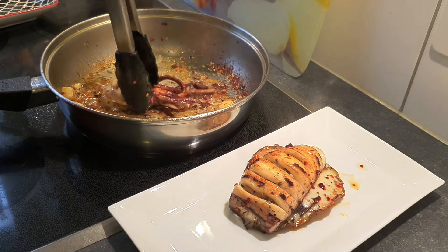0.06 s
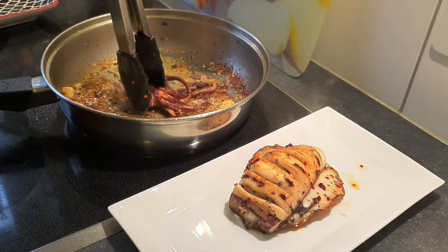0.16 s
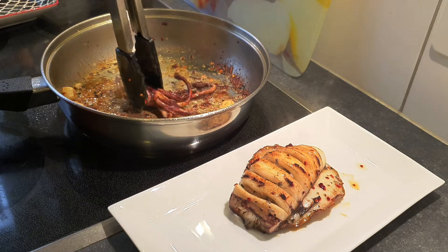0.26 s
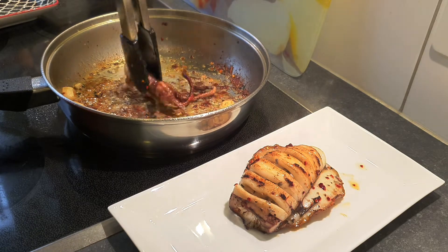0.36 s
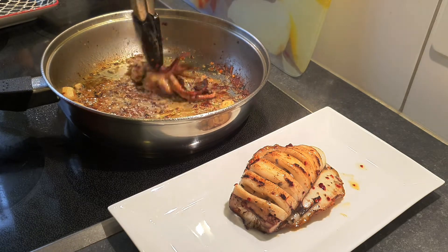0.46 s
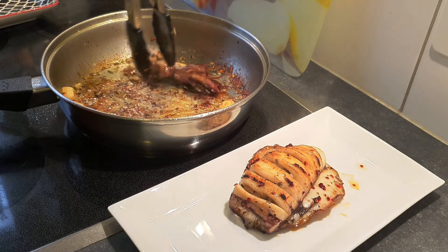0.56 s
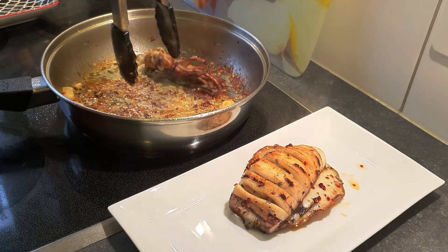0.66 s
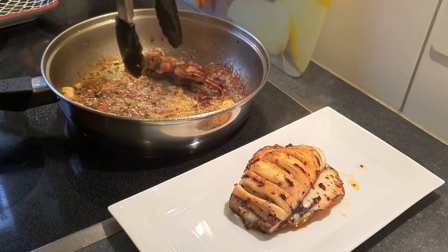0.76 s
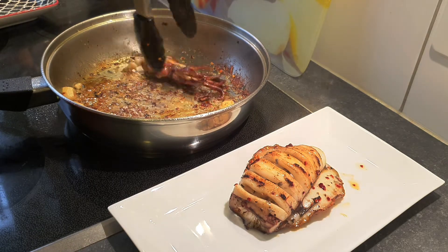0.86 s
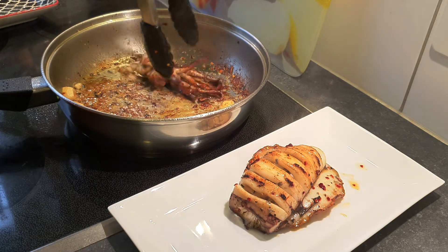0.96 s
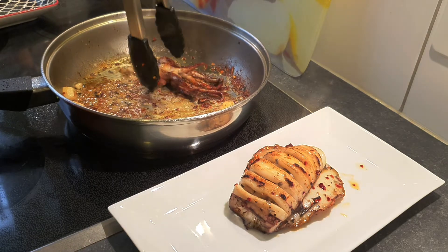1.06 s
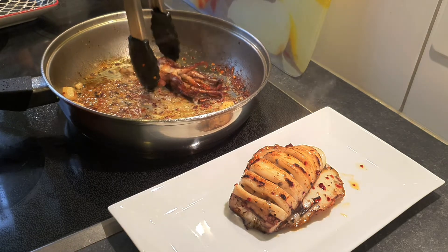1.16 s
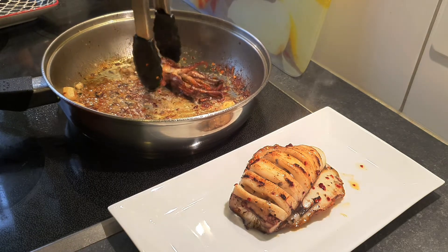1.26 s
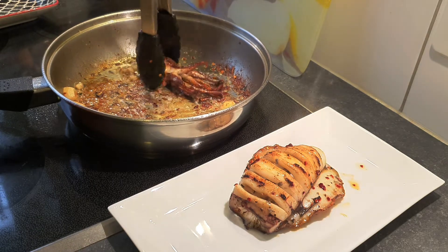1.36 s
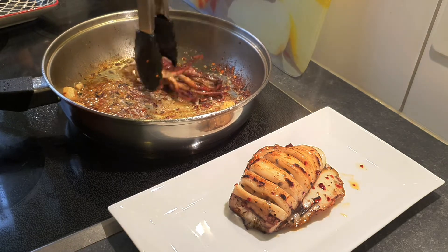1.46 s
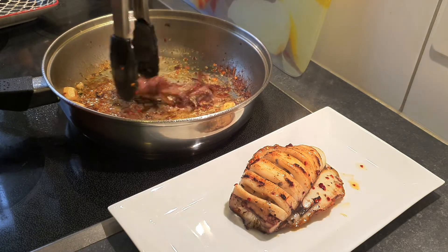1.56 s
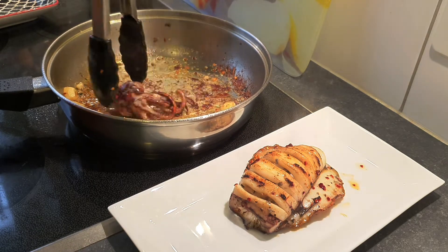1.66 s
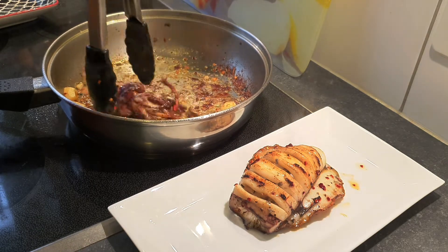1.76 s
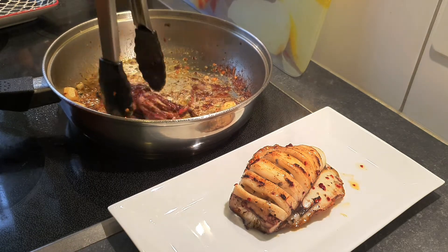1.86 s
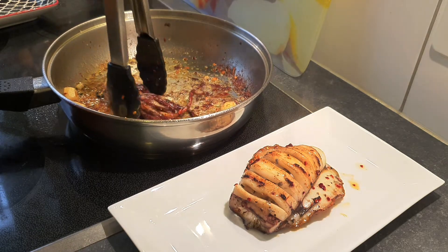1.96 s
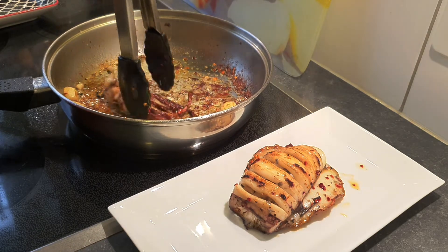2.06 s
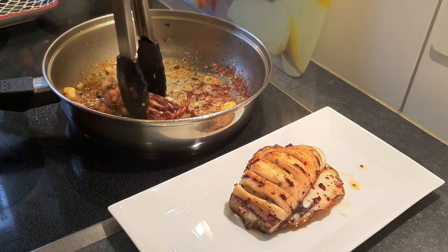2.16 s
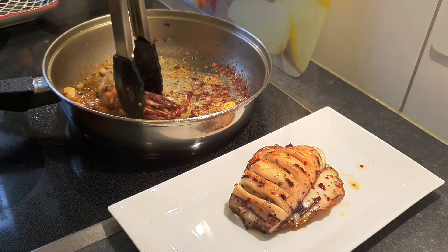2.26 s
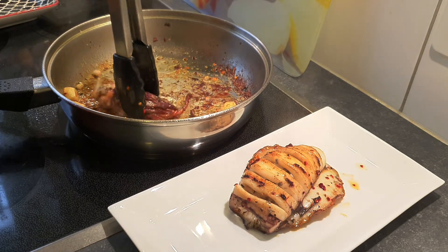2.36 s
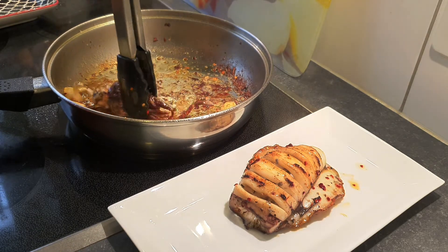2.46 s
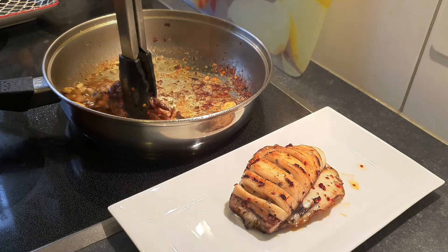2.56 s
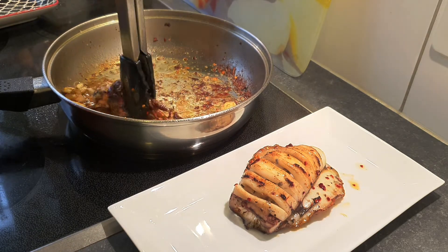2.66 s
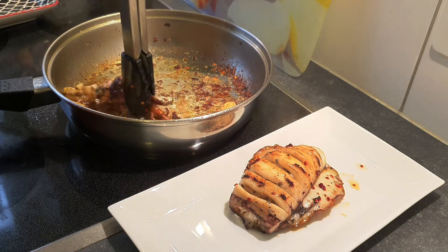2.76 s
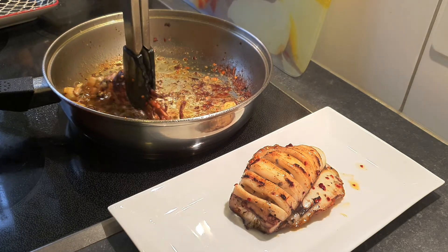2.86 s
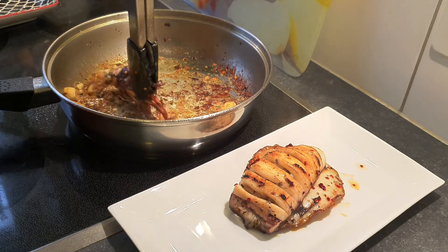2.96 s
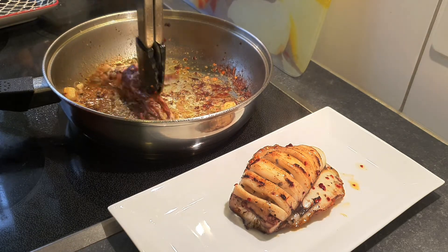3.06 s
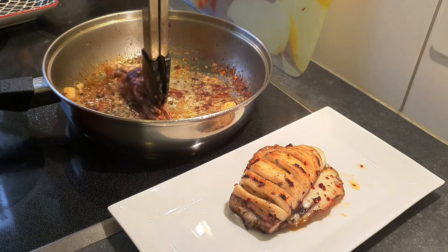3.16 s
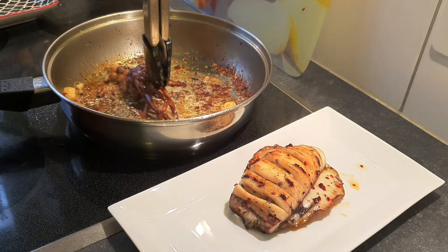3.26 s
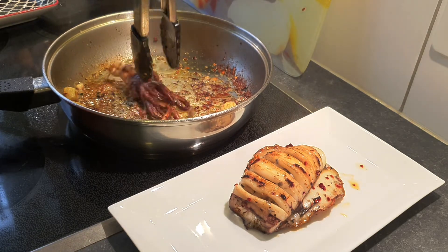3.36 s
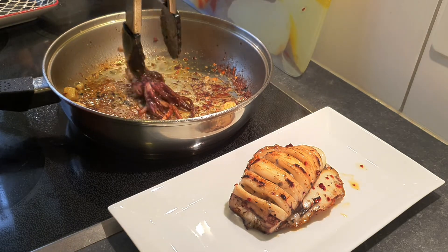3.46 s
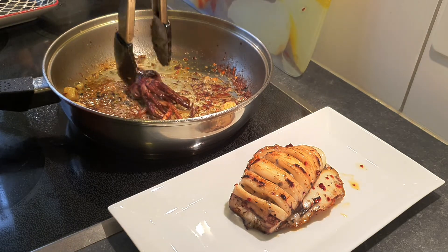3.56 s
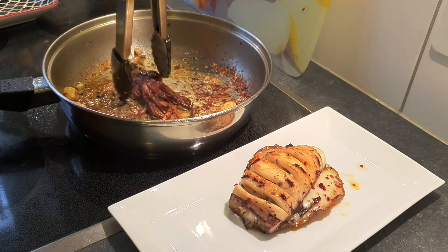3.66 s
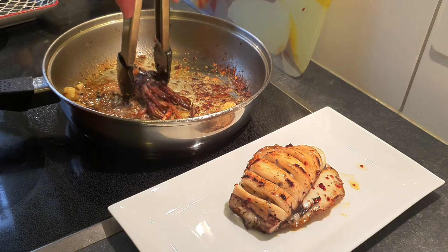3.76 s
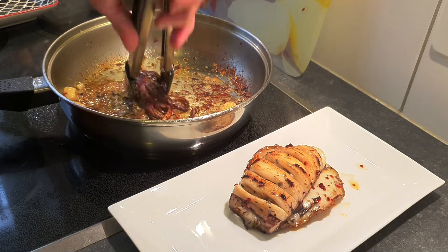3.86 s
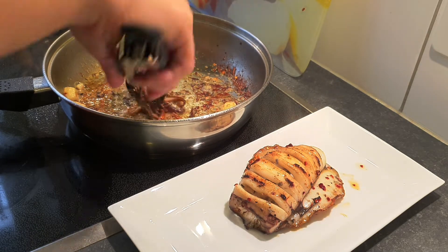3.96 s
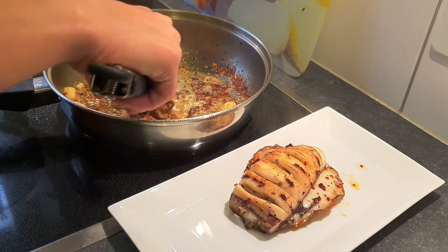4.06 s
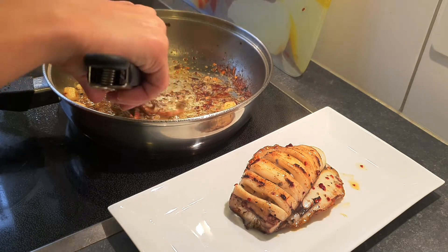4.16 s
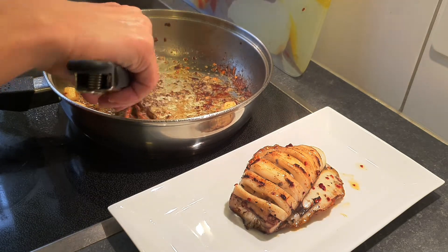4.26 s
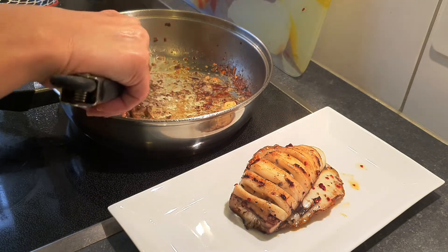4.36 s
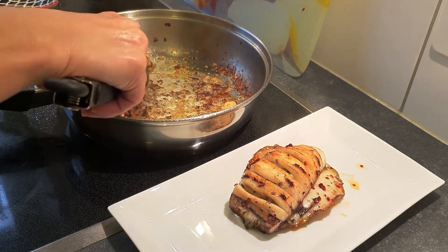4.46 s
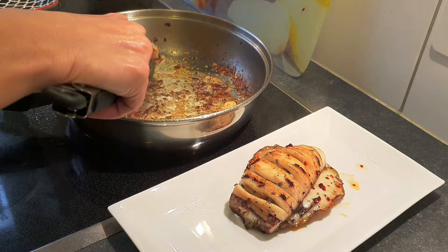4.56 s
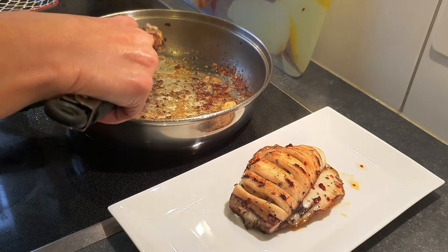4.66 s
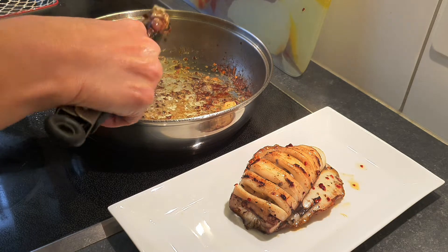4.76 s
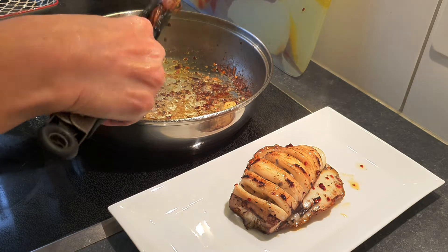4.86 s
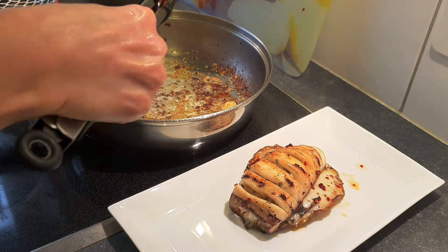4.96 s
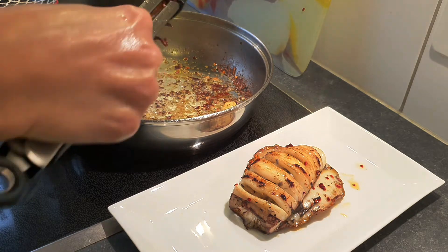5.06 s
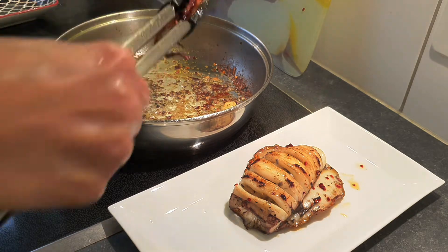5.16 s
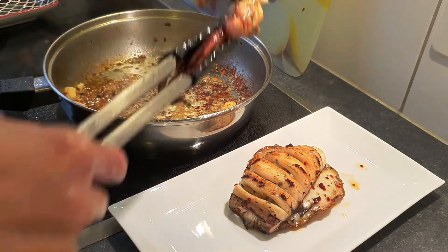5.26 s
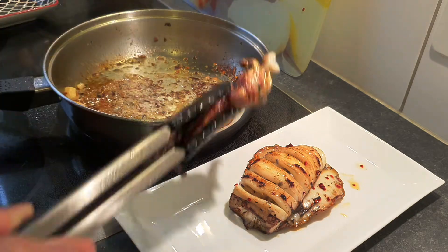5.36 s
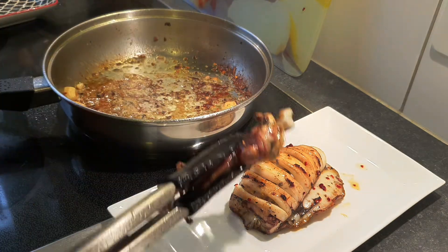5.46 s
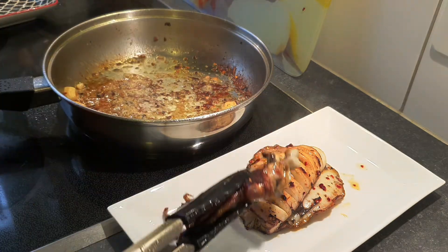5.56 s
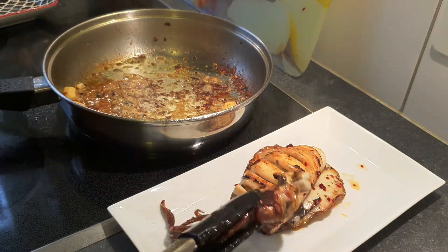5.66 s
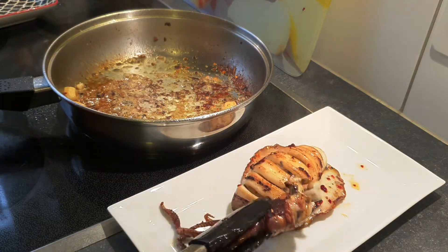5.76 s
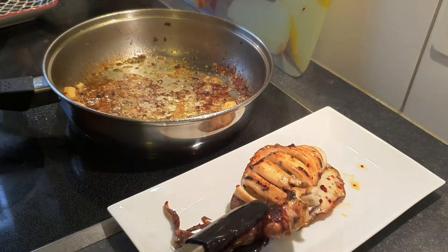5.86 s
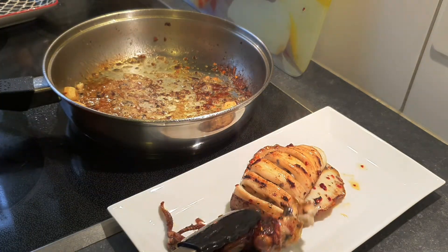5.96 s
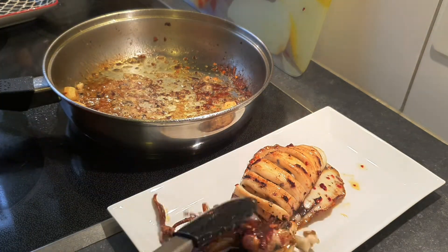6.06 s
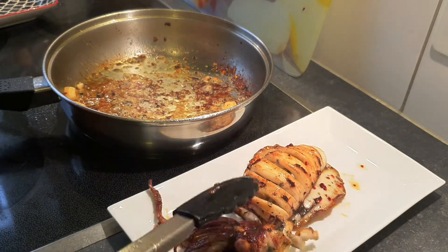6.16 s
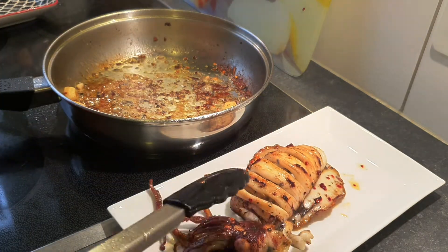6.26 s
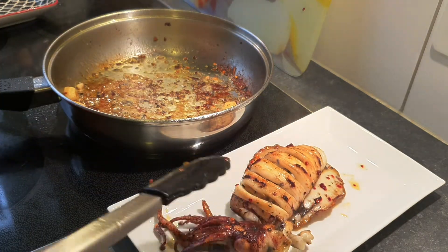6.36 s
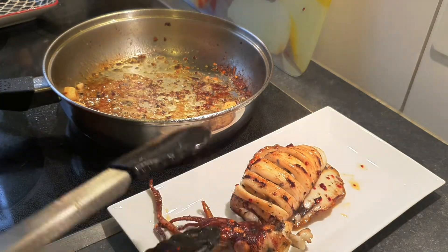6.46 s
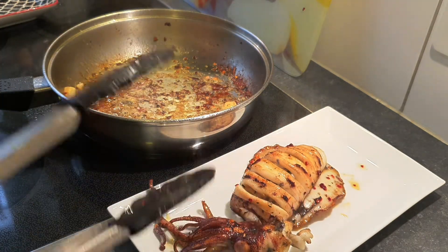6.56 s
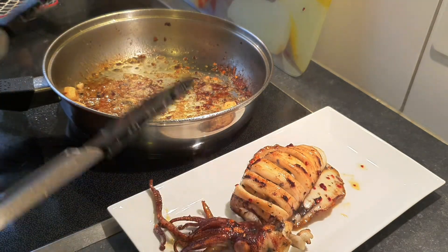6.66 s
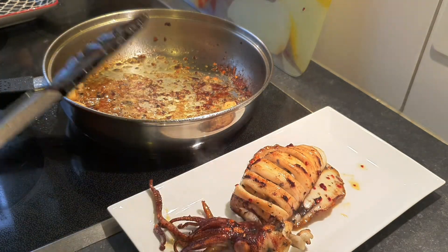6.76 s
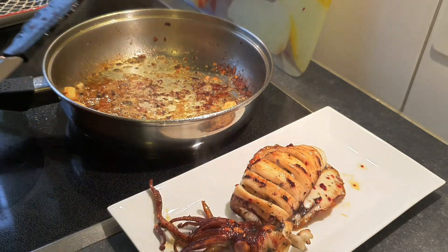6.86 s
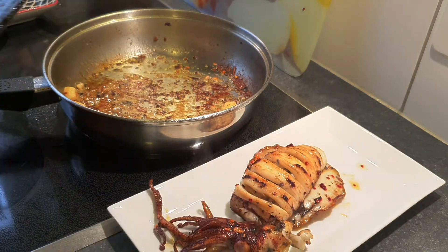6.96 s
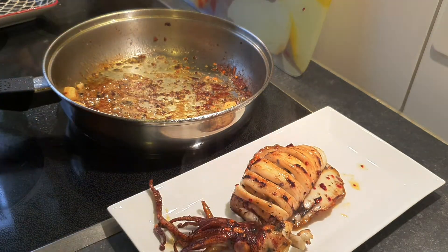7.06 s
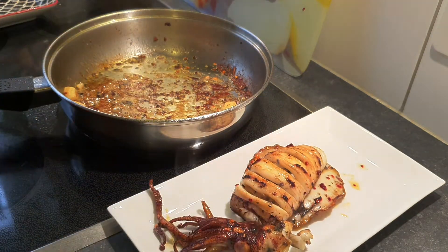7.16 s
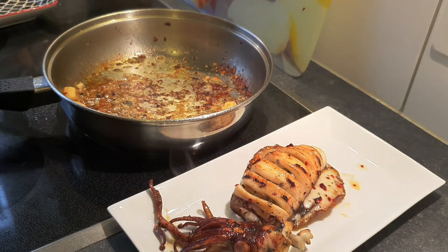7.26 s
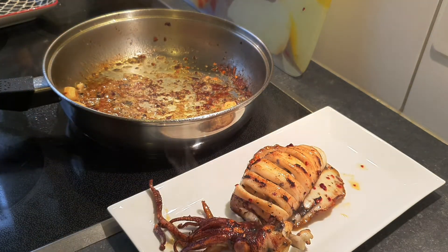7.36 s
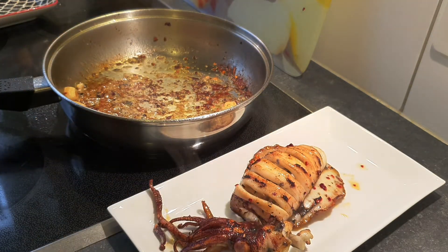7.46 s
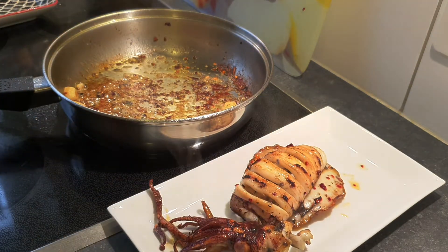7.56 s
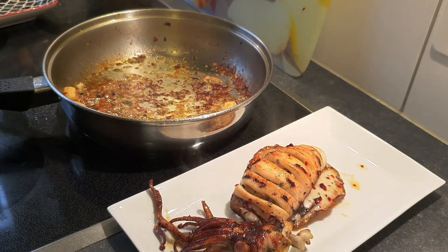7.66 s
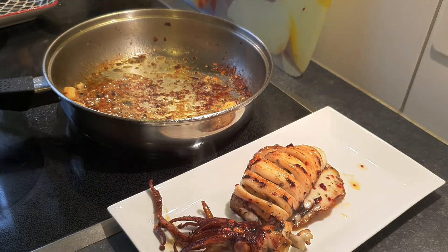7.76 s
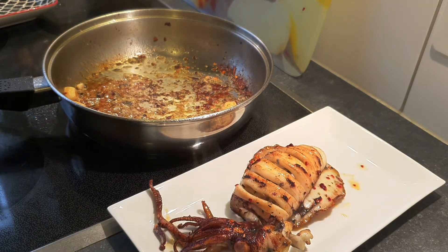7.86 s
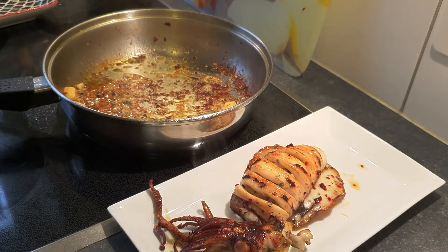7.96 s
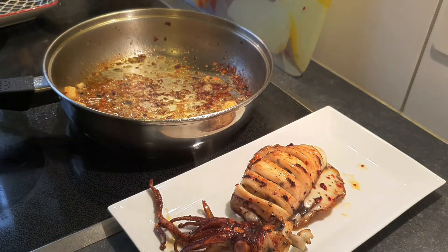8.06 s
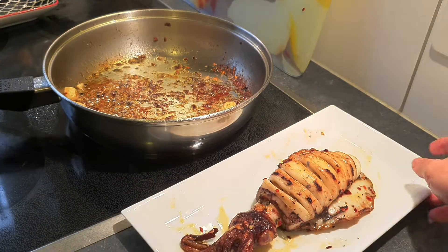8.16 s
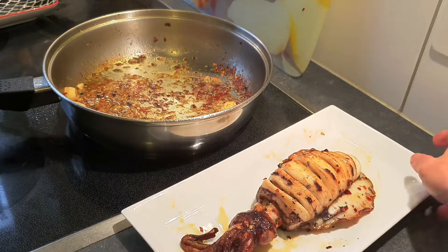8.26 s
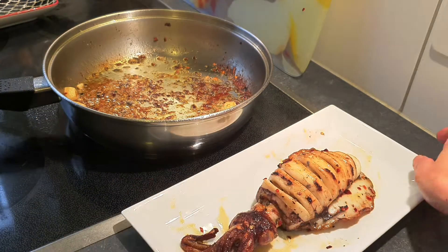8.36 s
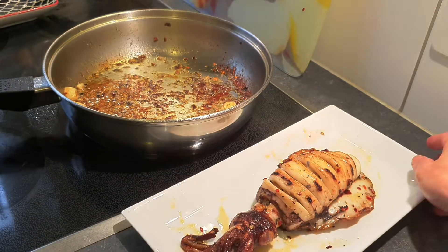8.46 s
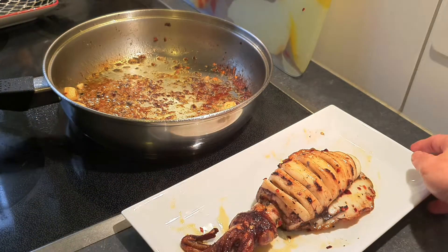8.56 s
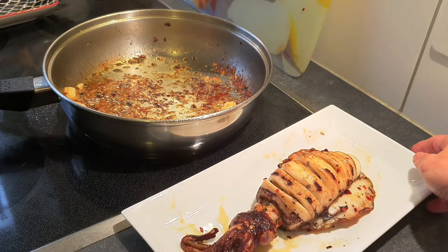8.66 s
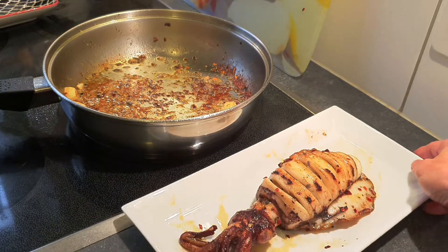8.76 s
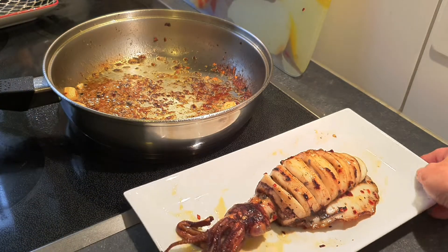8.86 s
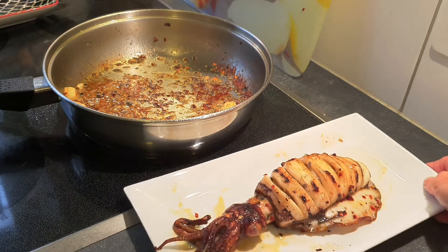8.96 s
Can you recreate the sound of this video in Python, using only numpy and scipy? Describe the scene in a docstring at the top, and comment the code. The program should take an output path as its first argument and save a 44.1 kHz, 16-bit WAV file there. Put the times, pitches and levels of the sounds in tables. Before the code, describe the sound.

Dense frying hiss with sharp oil spits and soft pan bumps dies down; after a tiny dropout a plate scrapes, squeaks faintly and clacks.

```python
"""Squid frying in a small kitchen

A close pair of microphones hears squid sizzle in hot oil in a steel pan on a glass hob: dense filtered noise
bursts. Tongs turn it, clink and bump the pan (dying modes); the oil calms to single spits once the food is
lifted out. A china plate knocks softly; around a brief silence at 8.1 s it slides, squeaks and knocks on the
worktop: modes struck by clicks or grit, and wavering tones. Mains hum and steady room noise lie behind it all."""
import sys
import numpy as np
from scipy import signal
from scipy.fft import rfft, irfft, next_fast_len
from scipy.io import wavfile
from scipy.ndimage import uniform_filter1d

SR = 44100
rng = np.random.default_rng(int(sys.argv[2]) if len(sys.argv) > 2 else 0)


def output_pcm(signal):
    """Save a mono or channel-first signal as 16-bit PCM at the path in sys.argv[1].

    Samples are clipped to [-1, 1] before scaling.
    """
    pcm = np.clip(np.atleast_2d(signal).T, -1, 1) * 32767
    wavfile.write(sys.argv[1], SR, np.round(pcm).astype(np.int16))


N = 397767
T = np.arange(N) / SR
HOP = 64  # samples between steps of the slow curves

# Levels in the tables are relative, ahead of the mixing gains and the recorder.
# How hard the oil fries: (time [s], fizz level [dB], crackle near 3 kHz against the fizz [dB])
FRYING = [(0, -37, -5.5), (.17, -37.5, -8), (.4, -36, -5), (.68, -33.5, -5), (.95, -35, -9),
          (1.4, -41, -7.5), (1.65, -39, -7), (1.94, -42.5, -9.5), (2.12, -40.5, -6.5), (2.3, -44.5, -7),
          (2.53, -36, -5.5), (2.66, -35.5, -6), (2.8, -38, -7.5), (2.92, -41, -8.5), (3.22, -38, -8),
          (3.48, -38, -6.5), (3.62, -34.5, -6.5), (4.15, -33, -5), (4.4, -37.5, -5), (5, -36.5, -8),
          (5.55, -42, -12), (5.9, -46.5, -9.5), (6.3, -51.5, -12.5), (6.65, -58.5, -17), (6.9, -55, -6.5),
          (7.15, -62.5, -7), (7.6, -64.5, -3), (8.05, -67, -16), (8.25, -76.5, 0), (8.46, -66, -3.5),
          (8.72, -71, -6), (9.02, -59.5, -5.5)]
# Colour of the frying pan and oil: (frequency [Hz], level [dB])
FIZZ_COLOUR = [(120, -48.5), (200, -24.5), (350, -25.5), (455, -12), (520, -12.5), (585, -20), (650, -8.5),
               (760, -9), (860, -13), (1010, -6.5), (1200, -10.5), (1450, -8), (1670, -10), (2000, -3),
               (2550, -3.5), (2850, 2.5), (3200, -1), (3550, 2), (4500, -0.5), (6500, -2.5), (7300, -5),
               (7800, -0.4), (9300, 5), (14000, 0.22), (15300, -1.5), (15800, 1.5)]
# Rarer, sharper bursts in the oil: (centre frequency [Hz], level [dB])
POPS = [(3600, -8), (6000, -10), (10000, -14), (13500, -7.5)]
POPS_PER_S, POP_T60_S, POP_SPREAD_DB = 30, 0.012, 3  # rate is for each row of POPS
# The bubbling under 1.5 kHz follows the fizz and crackle, down to a steady simmer
BUBBLING_DB, BUBBLING_FOLLOWS, SIMMER_DB, SIMMER_TOP_HZ = -13.5, 1.09, -71.5, 900
CLUMP_DB, CLUMP_S = 1.5, 0.05  # the bubbling comes and goes at random

# Bursting steam pockets, and near 6.07 s food set down on the plate: (time [s], peak level [dB], centre
# frequency [Hz], spray level against the crack [dB])
SPITS = [(0.066, -25, 4600, -13), (0.2305, -23, 5600, -13.5), (0.267, -27, 13000, -29),
         (0.2951, -21, 11200, -26), (0.355, -21.5, 4220, -20), (0.378, -25.5, 3280, -25),
         (0.47, -29, 8000, -15), (0.898, -16, 12100, -30), (1.2578, -22, 11400, -20),
         (1.6132, -26.5, 9760, -23), (1.6805, -31, 11600, -10), (2.05, -21, 6360, -19),
         (2.103, -25.5, 12500, -20.5), (2.176, -25, 9000, -25), (2.233, -29, 9700, -16),
         (2.3351, -45, 10100, -24.5), (2.51, -39, 4200, -32), (2.655, -23, 11000, -25.5),
         (2.854, -27.5, 8430, -29.5), (3.031, -26, 12700, -18), (3.1746, -24.5, 9420, -26),
         (5.1538, -28, 9750, -24), (5.4534, -30, 10400, -15), (5.6517, -24.5, 9940, -15),
         (5.7147, -28.5, 8290, -17), (5.937, -30, 9340, -17), (6.065, -29, 8520, -16),
         (6.071, -32.5, 3040, -11), (6.0976, -33, 11000, -15.5), (6.2226, -33, 10500, -18),
         (6.4234, -38, 10100, -13), (6.465, -35, 10400, -8), (6.559, -37.5, 8600, -14.5),
         (6.6314, -44, 10900, -21), (6.693, -47, 6000, -25), (6.71, -33, 11500, -25),
         (6.7519, -46.5, 11000, -15.5), (6.8067, -49, 9250, -15), (6.847, -32.5, 11800, -25),
         (6.872, -26, 9900, -38), (6.8937, -25, 11200, -36), (6.997, -45, 12700, -28),
         (7.0043, -29.5, 9800, -26.5), (7.019, -32, 9290, -31), (7.1919, -46, 8414, -28),
         (7.4874, -43.5, 10470, -16.5), (7.6085, -42, 9530, -22), (7.7667, -44, 10330, -25),
         (7.9314, -48.5, 9170, -24), (8.003, -39.5, 10900, -13)]
CRACK_RISE_S, CRACK_T60_S = 0.001, 0.022
CRACK_LOW, CRACK_HIGH, CRACK_TOP_HZ = 0.38, 1.8, 19000  # band edges as multiples of the centre, and their limit
SNAP = 3  # first click against the noise
SPRAY_T60_S, SPRAY_PATTER_DB = 0.25, 3.0
# One large bubble, a single row: [time [s], peak level [dB], frequency [Hz], t60 [s]]
BUBBLE = [3.0185, -40, 1460, 0.035]
# A soft hiss around 3 kHz swells and fades: (start [s], hold [s], level [dB])
SWELL = [(7.23, 0.03, -53.5)]

# Tongs on steel: (time [s], level [dB])
CLINKS = [(0.5079, -6)]
# Ringing modes of the steel: (frequency [Hz], level [dB], t60 [s])
STEEL_MODES = [(1825, -11, 0.29), (2048, -5.5, .15), (2260, -2.5, .15), (2480, -4, .15), (2743, 5, 0.17),
               (2961, -6, .3), (3080, -10, 0.3), (3260, -12.5, 0.21), (3600, -9, .25), (3900, -1, 0.28),
               (4110, -5, 0.14), (4400, -15, 0.15), (4600, -10.5, .08), (5220, -11.5, .1), (5680, -4, .12)]

# The pan bumps on the hob: (time [s], peak level [dB], sharpness as level of the upper knock [dB])
BUMPS = [(1.1225, -33.5, -16), (1.181, -46, -20), (1.985, -26, 0.5), (2.004, -40.5, 6), (2.101, -45.5, 11),
         (2.447, -44, -6), (4.2, -29.5, -16)]
# Low modes of the hob: (frequency [Hz], level [dB], t60 [s])
HOB_MODES = [(60, 5, 0.268), (87.5, 6, 0.23), (167.46, -15.5, 0.16), (183, -25.5, 0.063)]
# Colour of the dull knock: (frequency [Hz], level [dB])
KNOCK_COLOUR = [(120, -20), (165, 8.5), (230, 0), (380, -11), (455, 6), (560, -39), (800, -18), (1300, -6),
                (3000, -13), (5000, -38), (9000, -74.5)]
# Pushes at the pan, later at the plate: (start [s], hold [s], rocking level [dB], rubbing level [dB])
SHOVES = [(.17, 0.05, -55, -72), (.57, 0.0205, -48.5, -63), (1.03, 0.073, -70.5, -54),
          (1.12, 0.053, -48, -64), (1.52, 0.13, -57.5, -54.5), (1.62, 0.19, -64.5, -65.5),
          (1.975, 0.0066, -42, -42), (2.02, 0.1, -63, -50.5), (2.43, 0.098, -53, -81.5),
          (3.02, 0.032, -55.5, -83), (3.39, 0.044, -57, -66), (3.715, 0.24, -42, -65), (4.0, .07, -50, -66),
          (4.19, 0.16, -53, -65), (6.03, 0.081, -54.5, -58), (7.51, 0.019, -54.5, -63),
          (7.62, 0.41, -61, -69.5), (8.17, 0.028, -58, -76), (8.3, 0.026, -49, -46),
          (8.49, 0.055, -48.5, -74), (8.8, 0.16, -59, -65), (8.95, .05, -41.5, -61)]
SHOVE_RISE_S, SHOVE_T60_S = 0.021, 0.21
RESTING_ROCK_DB, RESTING_RUB_DB = -71.5, -73.5  # never quite still
# Colour of the rubbing: (frequency [Hz], level [dB])
RUB_COLOUR = [(90, -48.5), (150, 6.5), (200, -2), (300, -6.5), (500, -10), (1000, -14.5), (2000, -39)]

# Knocks on the plate: (time [s], level [dB], brightness [dB], depth [dB])
PLATE_KNOCKS = [(6.041, -39, -24.5, -9), (6.061, -35, -24.5, -10), (6.085, -39, -17, -7),
                (6.105, -45.5, -20.5, -15), (6.132, -53, -28.5, 4), (8.198, -38.5, -20.5, -12),
                (8.3006, -25, -6, 1.5), (8.319, -24.5, -12.5, -1), (8.335, -28, -13, -1),
                (8.352, -28.5, -13, -3), (8.385, -35, -16, -8), (8.9501, -31, 15.5, 3),
                (8.96, -15.5, 5, -7.5), (8.965, -21, 6.5, -3), (8.971, -21, 5, -7), (8.985, -33, -7, 2),
                (9.002, -27, -7, -2)]
# Modes of the china plate: (frequency [Hz], width [Hz], level [dB])
PLATE_MODES = [(216, 15, -5.5), (271.9, 11, 6), (332, 18.7, 13), (360, 32, 10.5), (443, 22, 9),
               (602, 38, 6.5), (703, 16, -2), (830, 130, -7.5), (1014, 32, -3), (1230, 70, -14),
               (1327, 81, 8), (1404, 67, 8.5), (1447, 43, 4), (1590, 37, 7), (1763, 32, 0), (1956, 67, 4),
               (2100, 44, 5), (2340, 49, 5), (2680, 69, 10), (2924, 55, 7), (3100, 50, -19), (3480, 55, 1),
               (3650, 71, -1), (3980, 43, -3), (5070, 200, -24), (11000, 5000, -27)]
# Colour of the crunch and scrape: (frequency [Hz], level [dB])
CRUNCH_COLOUR = [(500, -16), (900, -15), (1500, -1), (2800, -5), (3950, -8), (4150, -24), (8000, -27.5),
                 (12000, -35)]
# The plate slides on the worktop: (start [s], hold [s], level [dB], brightness [dB])
SLIDES = [(8.142, 0.016, -50, -17.5), (8.233, 0.041, -56.5, -13), (8.304, 0.046, -49, -11.5),
          (8.397, 0.17, -67, -4.5), (8.76, 0.041, -49, -6.5), (8.791, 0.079, -49, -6.5),
          (8.939, 0.04, -55, -11)]
SLIDE_RISE_S, SLIDE_T60_S = 0.032, 0.2
SLIDE_WANDER_DB, SLIDE_WANDER_S = 3, 0.025  # the sliding foot stirs now one mode, now another
CONTACT_SPREAD_DB = 2  # each knock lands elsewhere and favours other modes
# The foot of the plate squeaks, one list per squeak: (time [s], frequency [Hz], level [dB])
SQUEAKS = [
    [(7.9, 9900, -72), (7.96, 10400, -68.5), (8.0, 10800, -68)],
    [(8.295, 10370, -63), (8.32, 11380, -63), (8.395, 11600, -61), (8.41, 11900, -65), (8.425, 11150, -66),
     (8.47, 10740, -62), (8.5, 10300, -76)],
    [(8.73, 9900, -63), (8.784, 10400, -67), (8.787, 11200, -64.5), (8.8, 10750, -62), (8.9, 10950, -64.5),
     (8.96, 10840, -59)],
]

# Colour of the room noise: (frequency [Hz], level [dB])
ROOM_COLOUR = [(38, -35.5), (65, -16.5), (92, 1.5), (114, -6.5), (203, -11.5), (227, -39), (262, -9.5),
               (303, -17), (514, -30.5), (585, -53), (1500, -54.5), (3000, -47.5), (3900, -75),
               (6600, -120)]
ROOM_DB, HUM_HZ, HUM_DB = -62, 49.8, -59  # rms levels before the recorder
# Dying away of the kitchen: (frequency [Hz], t60 [s])
KITCHEN_DECAY = [(100, 0.035), (1000, 0.331), (4000, 0.315), (12000, 0.15)]
# Likeness of the two microphones: (frequency [Hz], left-right likeness [0 to 1])
LIKENESS = [(60, 0.5), (130, 0.868), (290, 0.58), (640, 0.7), (1400, 0.05), (2800, 0.095), (4500, 0.068),
            (8000, 0.061), (15000, .05)]
# Balance of the two microphones: (frequency [Hz], left over right [dB])
BALANCE = [(60, 0), (110, 0), (200, -0.5), (380, 1.7), (700, 1), (880, 7), (1290, 2), (2380, 3.5),
           (4400, 4), (7200, 5), (7900, 8), (8900, -0.5), (11500, 0.5), (15000, 6.5)]
LAG_S = 0.00016  # the left side hears the pan first

DROP_S, DROP_T60_S = 8.095, 0.0044  # the sound falls silent
BACK_S, BACK_RISE_S, AFTER_DB = 8.156, 0.0175, -2.5  # the sound returns
EDGE_HZ, RECORDER_DB = 15550, 1.5


def frying():
    """Dense hiss and thousands of tiny bursts of very unequal size, coloured by pan and oil."""
    sizes = gain_of(4 * np.minimum(rng.exponential(1, N), 4)) * (rng.random(N) < 600 / SR)
    fading = gain_of(-60 * T[:2000] / 0.004)
    # bursts are shared at random among four random echo tails, so no single tail colours them all
    share = rng.integers(0, 4, N)
    bursts = [play(sizes * (share == k), fading) * rng.standard_normal(N) for k in range(4)]
    pops = 0
    for centre_hz, db in POPS:
        pop_db = db + POP_SPREAD_DB * np.minimum(rng.exponential(1, N), 3.5)
        when = gain_of(pop_db) * (rng.random(N) < POPS_PER_S / SR)
        noise = band(rng.standard_normal(N), centre_hz * 0.75, centre_hz * 1.45)
        pops = pops + play(when, gain_of(-60 * T[:4000] / POP_T60_S)) * noise
    crackling = sum(heard(burst, wet_db=1.0) for burst in bursts) + heard(pops, wet_db=-3.0)
    hz, t, grains = signal.stft(crackling, SR, nperseg=256, noverlap=256 - HOP)

    a, b, c, d, patches = rng.standard_normal((len(t), len(hz), 5)).T
    hiss = paired((a + 1j * b).T, (c + 1j * d).T, hz).transpose(0, 2, 1)
    patches = evened(uniform_filter1d(uniform_filter1d(patches, 5, 0), 40, 1))
    flicker = evened(uniform_filter1d(rng.standard_normal(len(t)), 12))  # bursts come in clumps
    clumps = evened(uniform_filter1d(rng.standard_normal(len(t)), round(CLUMP_S * SR / HOP)))

    fizz_db, crackle_db = curves(FRYING, t)
    follow_db = BUBBLING_FOLLOWS * (fizz_db + crackle_db + 44.5)
    busy = gain_of(-45.5 + BUBBLING_DB + follow_db + CLUMP_DB * clumps)
    column_hz = hz[:, None]
    simmer_power = gain_of(SIMMER_DB) ** 2 / (1 + (column_hz / SIMMER_TOP_HZ) ** 4)
    bubbling_db = 10 * np.log10(busy ** 2 + simmer_power)
    middle = np.exp(-np.log(hz / 3000 + 1e-9) ** 2 / 0.23)[:, None]
    low = 1 / (1 + (column_hz / 1500) ** 4)
    tone_db = middle * (crackle_db + 7.0) + low * (bubbling_db - fizz_db + 20.5)
    uneven_db = 1.2 * patches + (0.65 + 0.021 * column_hz / 10000) * flicker

    mix = gain_of(-5.5) * grains / np.sqrt(np.mean(abs(grains) ** 2)) + gain_of(-2.5) * hiss
    mix *= gain_of(tone_db + fizz_db + uneven_db)
    size = 2 * next_fast_len(N // 2 + 1)
    plain = rfft(signal.istft(mix, SR, nperseg=256, noverlap=256 - HOP)[1][:, :N], size)
    colour = gain_of(read(FIZZ_COLOUR, np.fft.rfftfreq(size, 1 / SR)))
    return gain_of(-16.0) * irfft(plain * colour)[:, :N]


def spits():
    """Steam pockets burst, and food lands on the plate, in a sharp wide crack and a fading spray; one bubble
    rings and one hiss swells."""
    length = 8000
    out, t = np.zeros((3, N + length)), np.arange(length) / SR
    noises = rng.standard_normal((len(SPITS), length))
    for k, ((s, db, hz, spray_db), noise) in enumerate(zip(SPITS, noises)):
        burst = np.minimum(t / CRACK_RISE_S, 1) * gain_of(-60 * t / CRACK_T60_S) * noise + SNAP * (t == 0)
        crack = band(burst, hz * CRACK_LOW, min(hz * CRACK_HIGH, CRACK_TOP_HZ))
        # droplets land unevenly
        patter = gain_of(SPRAY_PATTER_DB * evened(uniform_filter1d(np.roll(noise, 4000), 150)))
        spray = coloured(band(noise, hz * 0.43, hz * 1.3), FIZZ_COLOUR)
        drops = patter * gain_of(-60 * t / SPRAY_T60_S) * spray
        spit = crack / abs(crack).max() + gain_of(spray_db) * drops
        start = round(s * SR)
        out[k % 3, start:start + length] += gain_of(db) * spit
    s, db, hz, t60 = BUBBLE
    out[0, :N] += play(blows([s], db), ringing([(hz, 0, t60)], cycles=1.8))
    swell = strokes(SWELL, rise_s=0.028, t60_s=0.29)[0]
    out[1, :N] += swell * band(rng.standard_normal(N), 1540, 5200)
    # spits take turns among three random echo tails, which keeps their echoes varied
    return sum(heard(share[:N], wet_db=-6.0, lag=0.0001) for share in out)


def tongs():
    """A hard first crack; the steel rings briefly while the oil splashes."""
    t = T[:SR // 2]
    crack = ringing([(2350, -5.5, 0.01), (2960, -12.5, 0.015), (5170, -12, 0.0075), (8200, -11.0, 0.012)])
    splash = band(rng.standard_normal(len(t)), 1950, 3900) * gain_of(-18 - 60 * t / 0.3)
    droplets = gain_of(2.2 * rng.exponential(1, len(t))) * (rng.random(len(t)) < 700 / SR)
    drops = play(droplets, gain_of(-60 * T[:2000] / 0.017))[:len(t)]
    splash = splash * evened(3 + drops)  # the splash breaks up into drops
    sound = crack + gain_of(-20.0) * ringing(STEEL_MODES) + splash
    return heard(play(blows(*np.transpose(CLINKS)), sound), wet_db=-6.5, lag=0.00006)


def hob():
    """Bumps and rocking shake the low modes of the hob; sharp bumps add a hard tick and a dull knock."""
    s, db, sharp_db = np.transpose(BUMPS)
    rock, rub = strokes(SHOVES, SHOVE_RISE_S, SHOVE_T60_S)
    sharp_blows = blows(s, db + sharp_db)
    dying = play(sharp_blows, gain_of(-8.5 - 60 * T[:SR // 4] / 0.121))
    knocks = dying * coloured(rng.standard_normal(N), KNOCK_COLOUR)
    tick = play(sharp_blows, gain_of(-6 - 60 * T[:2000] / 0.025))
    knocks = knocks + tick * band(rng.standard_normal(N), 800, 4200)
    rubbing = coloured(rng.standard_normal(N), RUB_COLOUR) * (rub + gain_of(RESTING_RUB_DB))
    rumble = evened(play(rng.standard_normal(N), ringing(HOB_MODES)))
    rocking = rumble * (rock + gain_of(RESTING_ROCK_DB))
    thuds = play(blows(s, db), ringing(HOB_MODES, cycles=0.19))
    # the low modes reach both microphones alike, without echoes
    return (rocking + thuds)[None] + heard(knocks + rubbing, wet_db=-4.5)


def plate():
    """Gritty slips and knocks ring the plate; hard contact brings out its upper modes and a crunch."""
    slide_rows = [(s, hold, db, db + up_db) for s, hold, db, up_db in SLIDES]
    dull, bright = strokes(slide_rows, SLIDE_RISE_S, SLIDE_T60_S)
    grit = gain_of(2.0 * rng.exponential(1, N)) * (rng.random(N) < 2500 / SR) * rng.choice([-1, 1], N)
    # the slips come unevenly
    grit = evened(grit * gain_of(1.9 * evened(uniform_filter1d(rng.standard_normal(N), 300))))

    def strength(modes):
        """Estimated level of these modes stirred by grit, used to even the slide."""
        return np.linalg.norm([gain_of(d) * np.sqrt(SR / width / 12) for hz, width, d in modes])

    lower = 1.4 * strength([mode for mode in PLATE_MODES if mode[0] < 900])
    upper = 1.2 * strength([mode for mode in PLATE_MODES if mode[0] >= 900])
    wander = rng.standard_normal((len(PLATE_MODES), N // HOP + 1))
    wander = evened(uniform_filter1d(wander, round(SLIDE_WANDER_S * SR / HOP)))
    s, db, hard_db, deep_db = np.transpose(PLATE_KNOCKS)
    favour_db = CONTACT_SPREAD_DB * rng.standard_normal((len(s), len(PLATE_MODES)))
    slide = knocks = 0
    for k, (hz, width, d) in enumerate(PLATE_MODES):
        stir = np.interp(T, T[::HOP], gain_of(SLIDE_WANDER_DB * wander[k]))
        push = dull / lower if hz < 900 else bright / upper
        slide = slide + play(grit * stir * push, gain_of(d) * ringing([(hz, 0, 2.2 / width)])[:SR // 4])
        mode_db = db + d - 20.5 + (hz < 400) * deep_db + (hz >= 900) * hard_db + favour_db[:, k]
        knocks = knocks + play(blows(s, mode_db), ringing([(hz, 0, 2.36 / width)])[:SR // 4])

    dying = play(blows(s, db + hard_db), gain_of(-60 * T[:SR // 4] / 0.047))
    crunch = dying * gain_of(-16.5) * coloured(rng.standard_normal(N), CRUNCH_COLOUR)
    scrape = coloured(grit, CRUNCH_COLOUR) * bright * gain_of(-5.5)
    return heard(slide + scrape + knocks + crunch, wet_db=-7.5)


def squeaks():
    """The foot of the plate squeaks: a thin, rough whistle, wavering in pitch and level."""
    out = np.zeros(N)
    for rows in SQUEAKS:
        hz, db = curves(rows)
        waver, flutter = (evened(uniform_filter1d(v, 90)) for v in rng.standard_normal((2, N)))
        tone = np.sin(2 * np.pi * np.cumsum(hz * (1 + 0.00315 * waver)) / SR)
        sounding = (T > rows[0][0]) * (T < rows[-1][0])
        out += gain_of(db + 2.15 * flutter) * tone * sounding
    return heard(out, wet_db=-6)


def kitchen():
    """Mains hum, a steady sine a little stronger on the left, over steady room noise."""
    size = 2 * next_fast_len(N // 2 + 1)
    hz = np.fft.rfftfreq(size, 1 / SR)
    noise = paired(*rfft(rng.standard_normal((2, size))), hz)
    air = irfft(noise * gain_of(read(ROOM_COLOUR, hz)))[:, :N]
    hum_gain = gain_of(HUM_DB + np.array([[0.8], [-0.8]])) * np.sqrt(2)
    return gain_of(ROOM_DB) * evened(air) + hum_gain * np.sin(2 * np.pi * HUM_HZ * T)


def heard(x, wet_db, lag=LAG_S):
    """Direct sound reaches the left microphone first; the kitchen adds a dying tail, drawn anew on each call."""
    length = SR // 2
    hz, t, echoes = signal.stft(rng.standard_normal((2, length)), SR, nperseg=256)
    echoes = echoes * gain_of(-60 * t / read(KITCHEN_DECAY, hz)[:, None]) * (t > 0.004)
    tail = rfft(signal.istft(echoes, SR, nperseg=256)[1][:, :length])
    tail = evened(abs(tail)) * tail / abs(tail)
    f = np.fft.rfftfreq(length, 1 / SR)
    lean = gain_of(read(BALANCE, f) / 2)
    direct = np.array([lean, np.exp(-2j * np.pi * f * lag) / lean])
    direct = direct * np.exp(-2j * np.pi * f * 64 / SR)  # 64 samples of lead-in, cut off below
    response = irfft(direct + gain_of(wet_db) * paired(*tail, f))
    return signal.oaconvolve(x[None], response, axes=1)[:, 64:N + 64]


def paired(a, b, hz):
    """Two unrelated spectra become left and right: alike in the bass, apart in the treble, right a little late."""
    same = np.clip(read(LIKENESS, hz), -1, 1)
    lean = gain_of(read(BALANCE, hz) / 2)
    late = np.exp(-2j * np.pi * hz * LAG_S)
    return np.array([a * lean, (same * a * late + np.sqrt(1 - same ** 2) * b) / lean])


def ringing(modes, cycles=1.0):
    """Dying sines, peak 1; each builds up over about the given number of cycles."""
    t = np.arange(SR // 2) / SR
    x = 0
    for hz, db, t60 in modes:
        build_up = 1 - np.exp(-hz * t / cycles)
        x = x + gain_of(db - 60 * t / t60) * np.sin(2 * np.pi * hz * t) * build_up
    return x / abs(x).max()


def blows(seconds, db):
    """One sample of force at each moment."""
    x = np.zeros(N)
    np.add.at(x, np.round(np.asarray(seconds) * SR).astype(int), gain_of(db))
    return x


def play(x, sound):
    """Every sample of x sets off the sound."""
    return signal.oaconvolve(x, sound)[:N]


def strokes(rows, rise_s, t60_s):
    """Each row rises, holds and dies away; gives one amplitude curve for each level column."""
    t = T[::HOP]
    start, hold, *levels = np.transpose(rows)[:, :, None]
    rise = np.clip((t - start) / rise_s, 0, 1)
    shape = rise * gain_of(-60 * np.maximum(t - start - rise_s - hold, 0) / t60_s)
    return [np.interp(T, t, np.linalg.norm(gain_of(db) * shape, axis=0)) for db in levels]


def curves(rows, t=T):
    """Each column of a table as a curve over time."""
    s, *columns = np.transpose(rows)
    return [np.interp(t, s, c) for c in columns]


def coloured(noise, spectrum):
    """Gives noise a spectrum, rms 1."""
    size = next_fast_len(len(noise))
    colour = gain_of(read(spectrum, np.fft.rfftfreq(size, 1 / SR)))
    return evened(irfft(rfft(noise, size) * colour, size)[:len(noise)])


def band(x, lo_hz, hi_hz):
    """Band-pass with edges kept within 300 Hz to 19 kHz, rms 1."""
    edges = np.clip([lo_hz, hi_hz], 300, 19000)
    return evened(signal.lfilter(*signal.butter(2, edges, "band", fs=SR), x))


def read(points, hz):
    """Reads a spectrum table on a log-frequency axis."""
    f, value = np.transpose(points)
    return np.interp(np.log(hz + 1), np.log(f + 1), value)


def evened(x):
    """Scales to rms 1."""
    return x / np.sqrt(np.mean(x ** 2) + 1e-20)


def gain_of(db):
    """Decibels to amplitude."""
    return 10 ** (np.asarray(db) / 20)


def scene():
    """All sources together, from the pan to the room."""
    return frying() + spits() + tongs() + hob() + plate() + squeaks() + kitchen()


def record(dry):
    """The microphones lose the deepest bass; all sound falls silent briefly and returns quieter; then a treble
    limit."""
    before = gain_of(-60 * np.maximum(T - DROP_S, 0) / DROP_T60_S)
    after = gain_of(AFTER_DB) * (1 - np.exp(-np.maximum(T - BACK_S, 0) / BACK_RISE_S)) ** 2
    level = before + after + gain_of(-73.5)  # the sound stays faintly audible through the silence
    cut = signal.sosfilt(signal.butter(4, 42, "high", fs=SR, output="sos"), dry) * level
    treble_limit = signal.firwin(511, EDGE_HZ, window=("kaiser", 9), fs=SR)
    return signal.oaconvolve(cut, treble_limit[None], "same") * gain_of(RECORDER_DB)


dry = scene()
out = record(dry)
output_pcm(out)
```